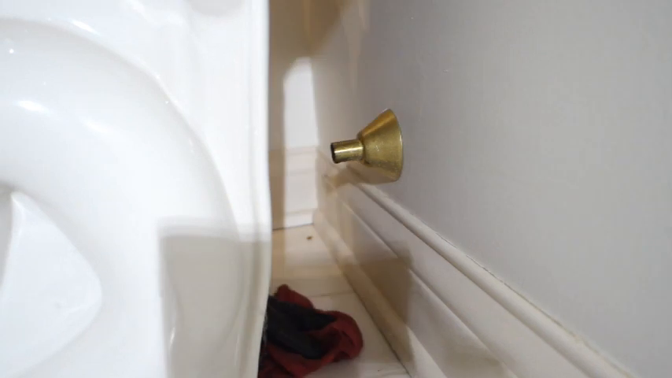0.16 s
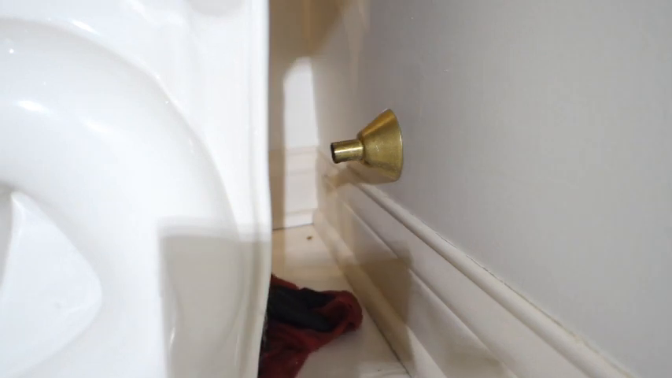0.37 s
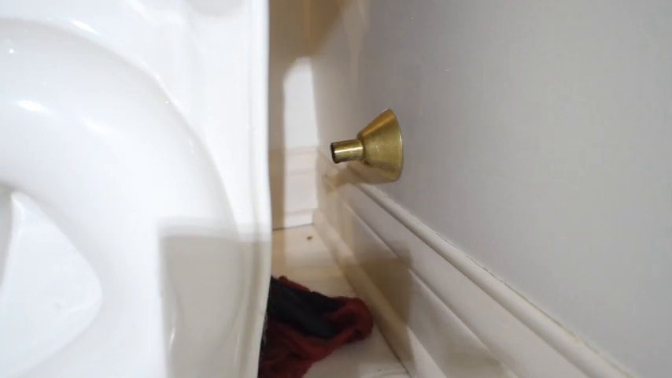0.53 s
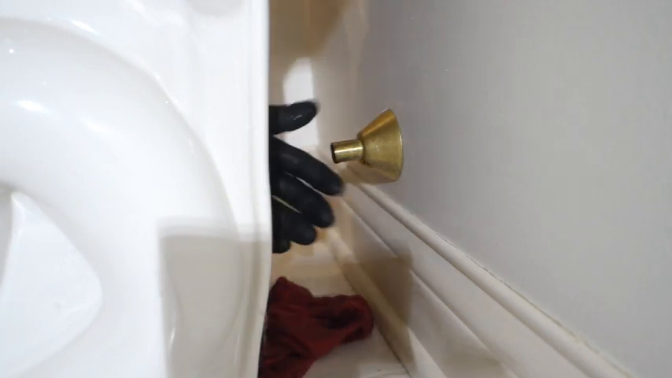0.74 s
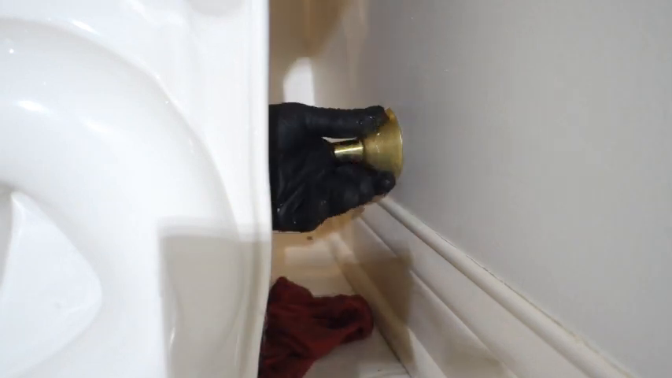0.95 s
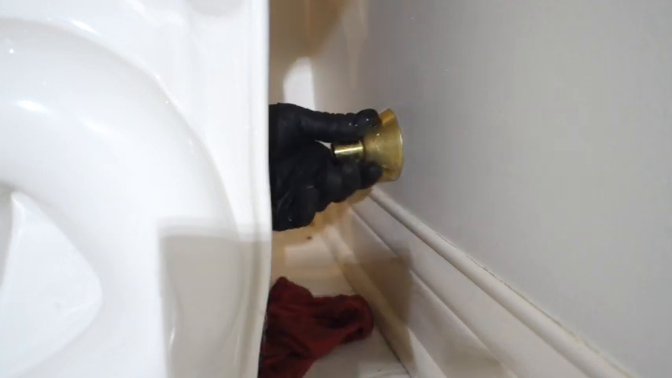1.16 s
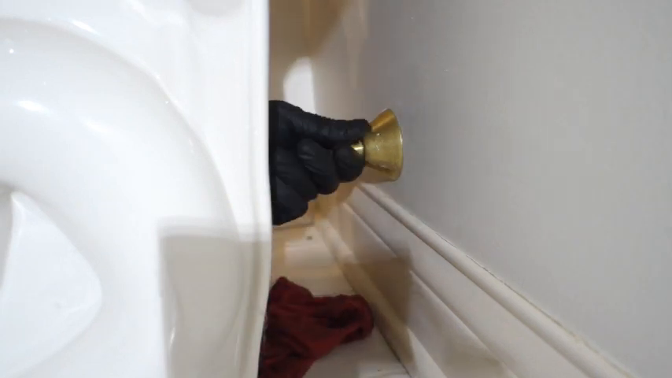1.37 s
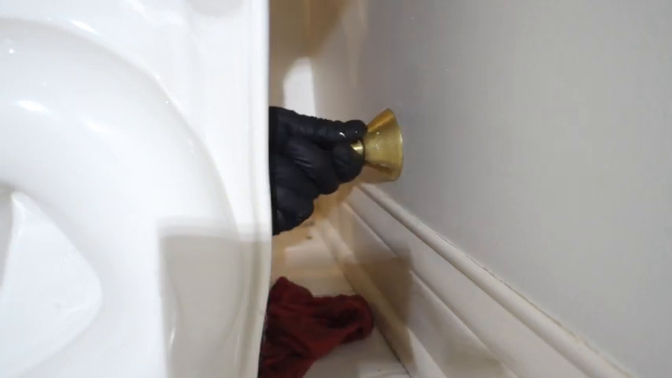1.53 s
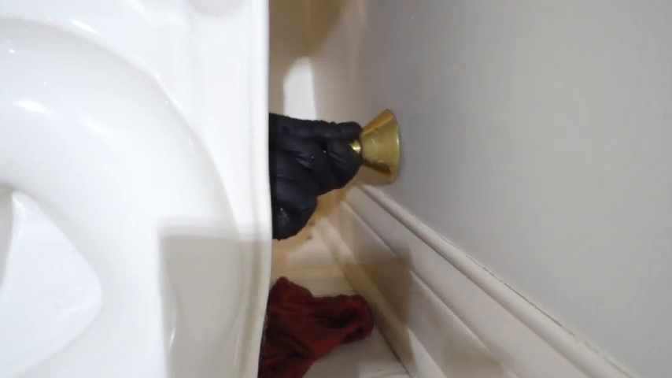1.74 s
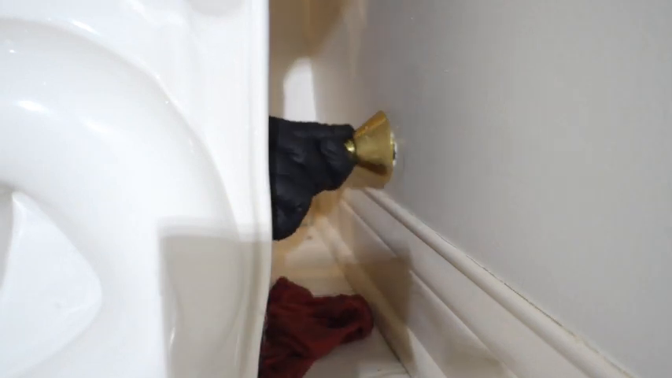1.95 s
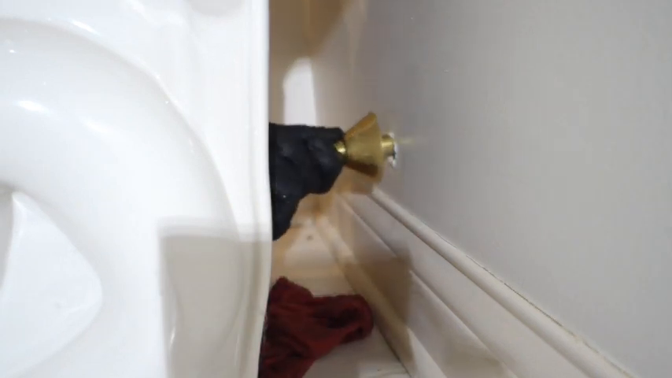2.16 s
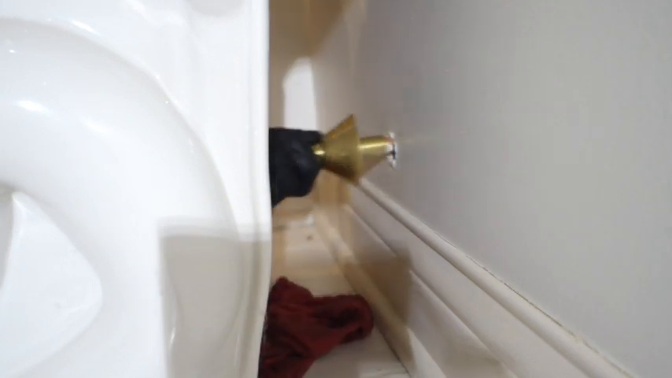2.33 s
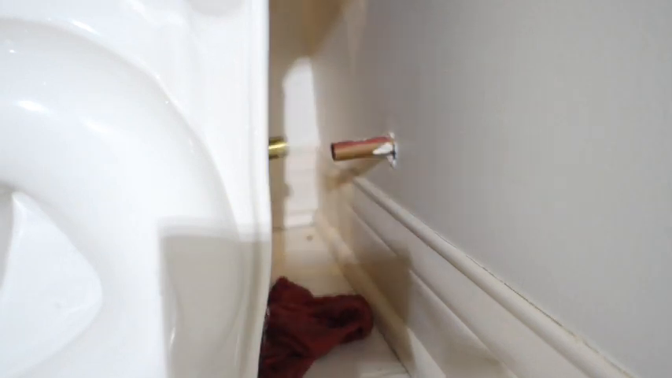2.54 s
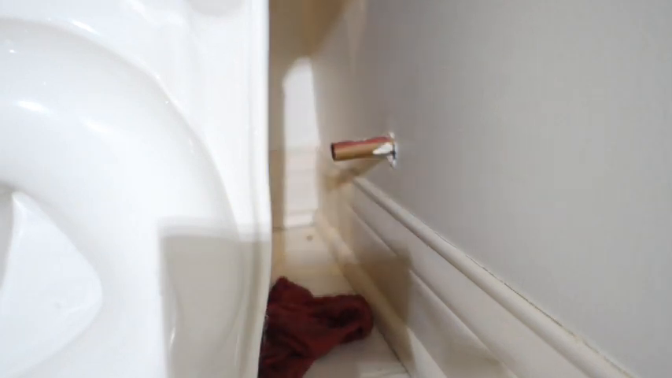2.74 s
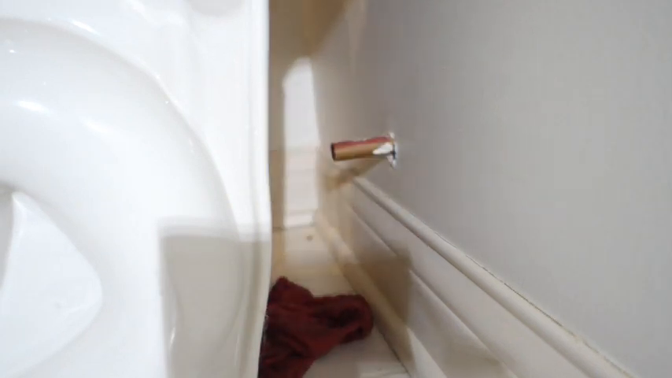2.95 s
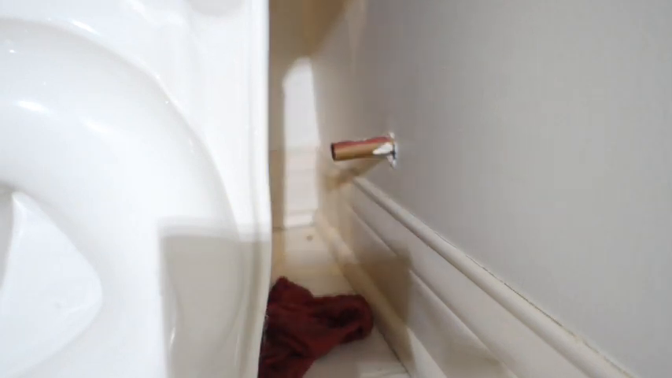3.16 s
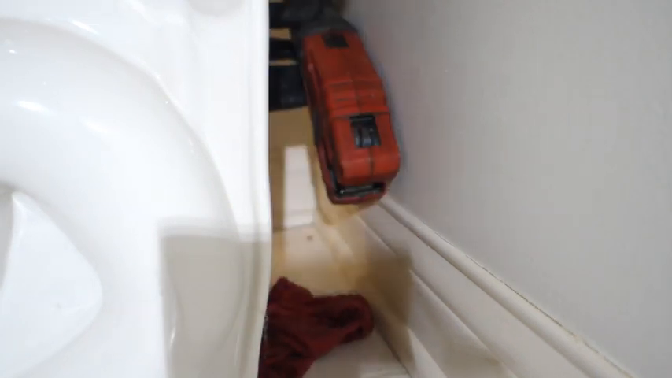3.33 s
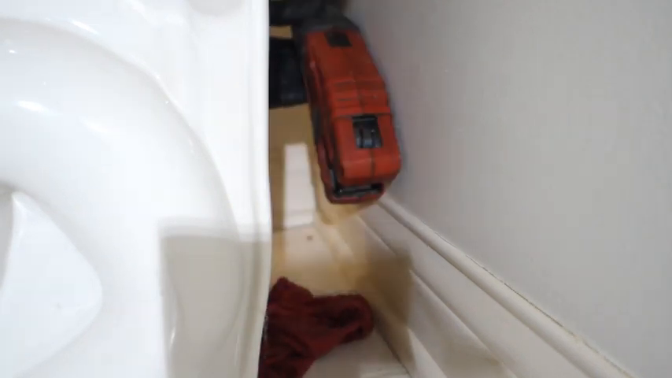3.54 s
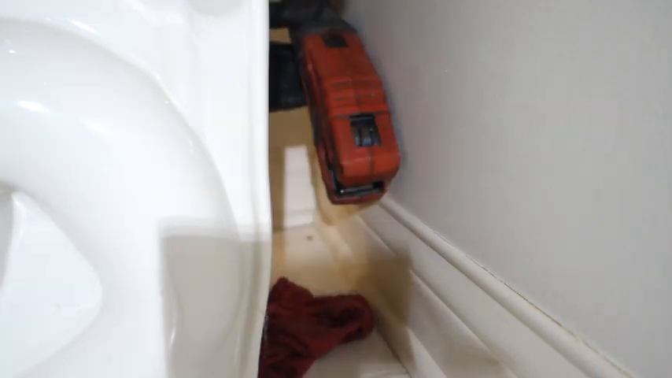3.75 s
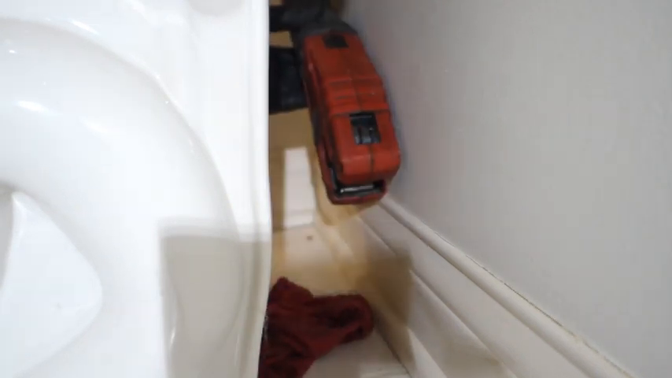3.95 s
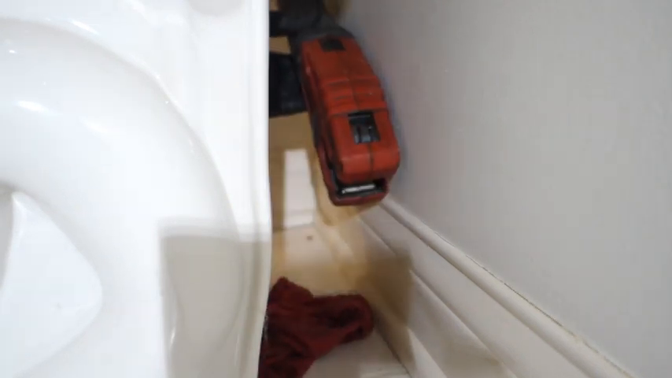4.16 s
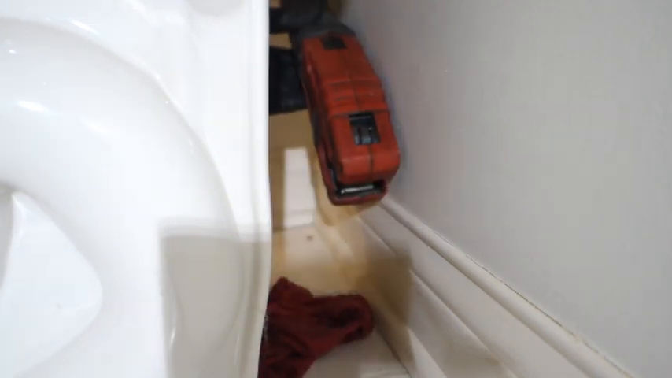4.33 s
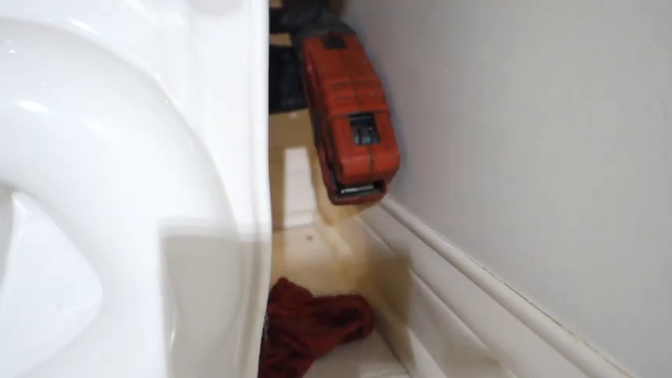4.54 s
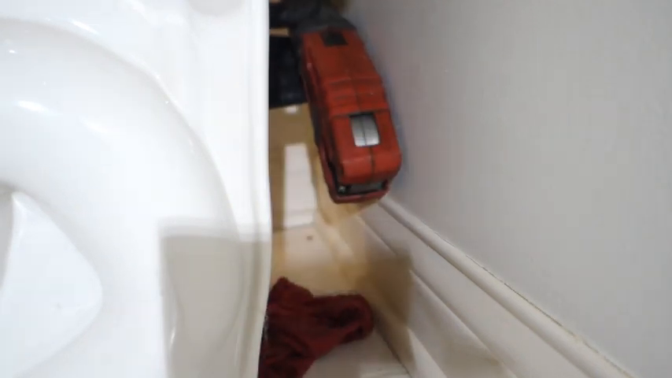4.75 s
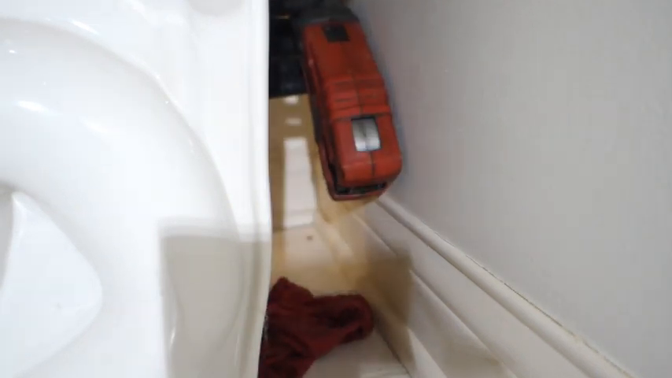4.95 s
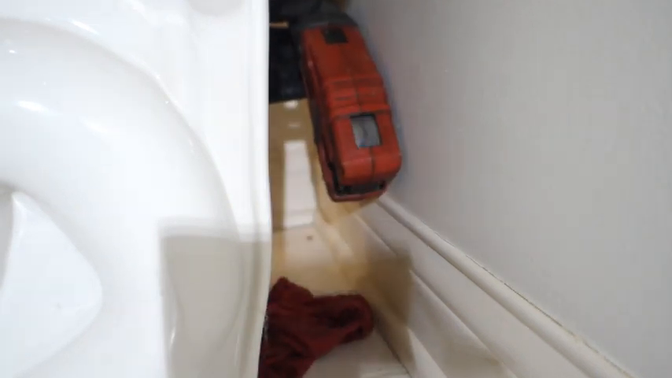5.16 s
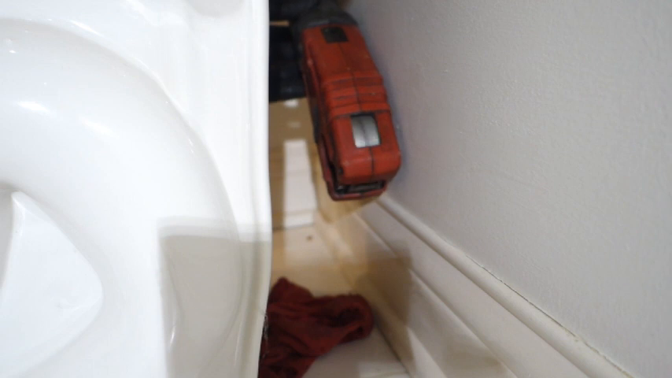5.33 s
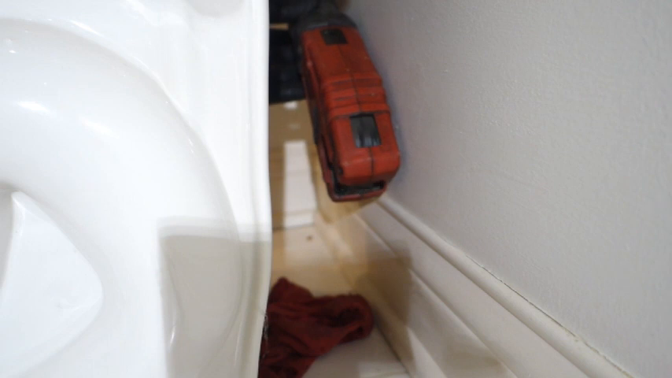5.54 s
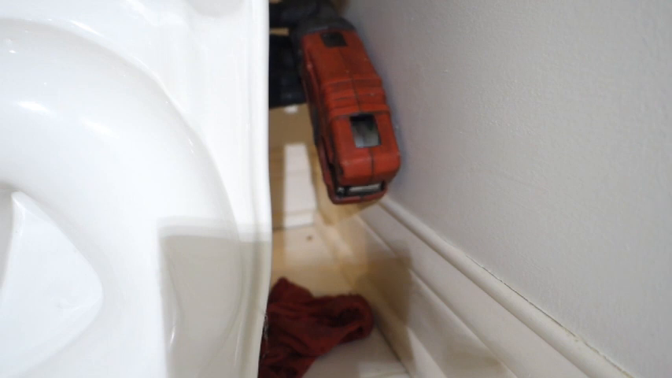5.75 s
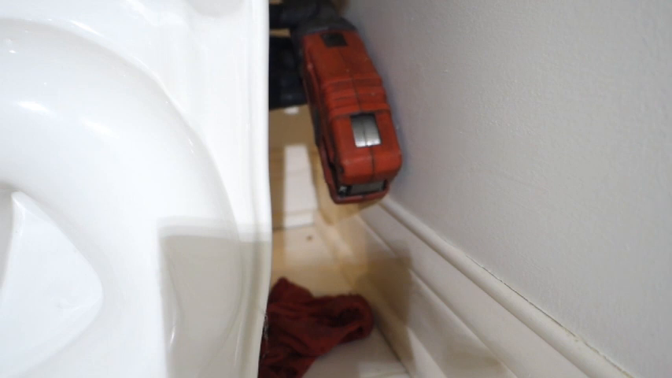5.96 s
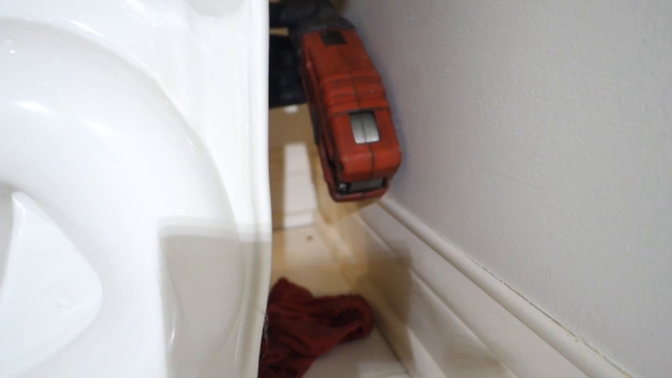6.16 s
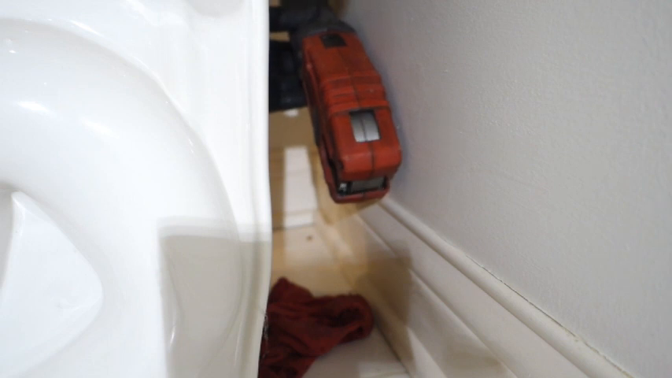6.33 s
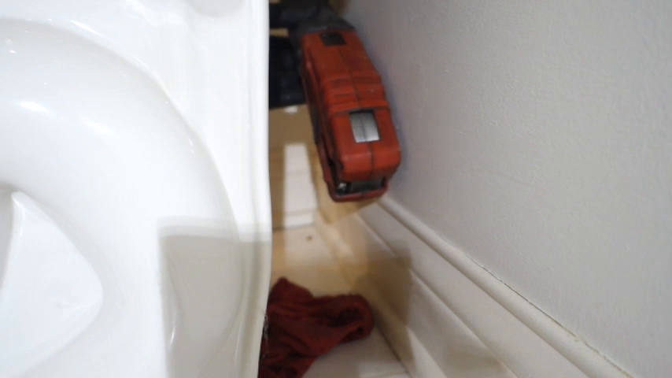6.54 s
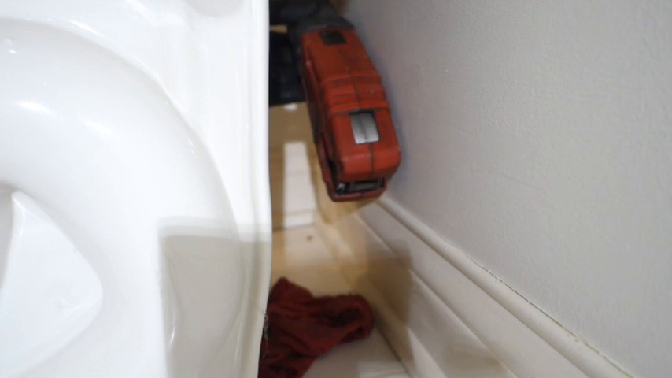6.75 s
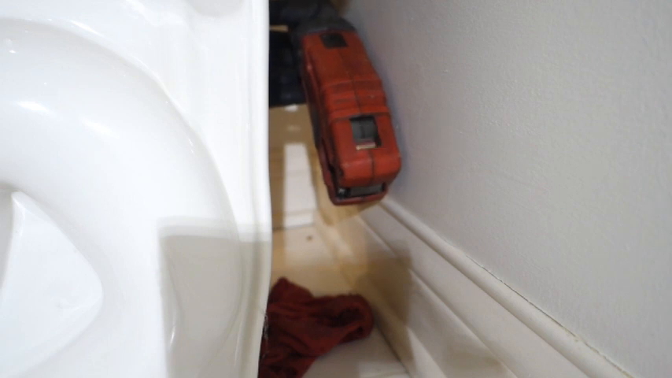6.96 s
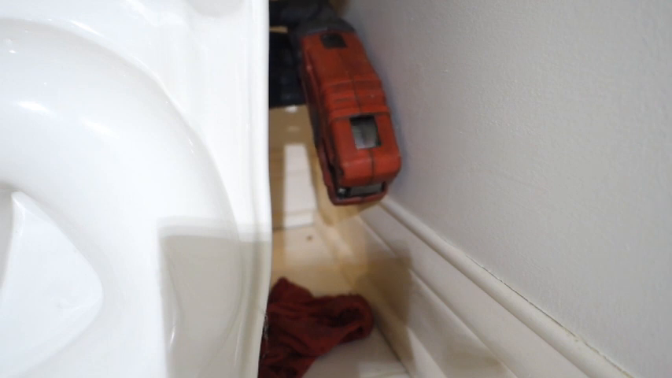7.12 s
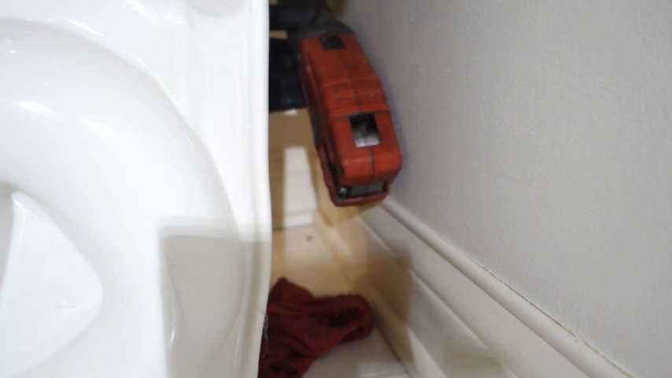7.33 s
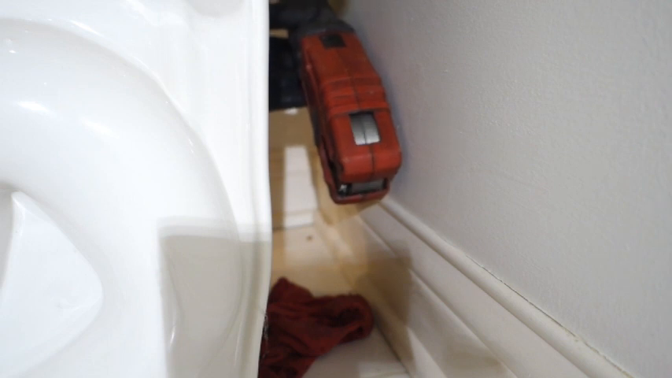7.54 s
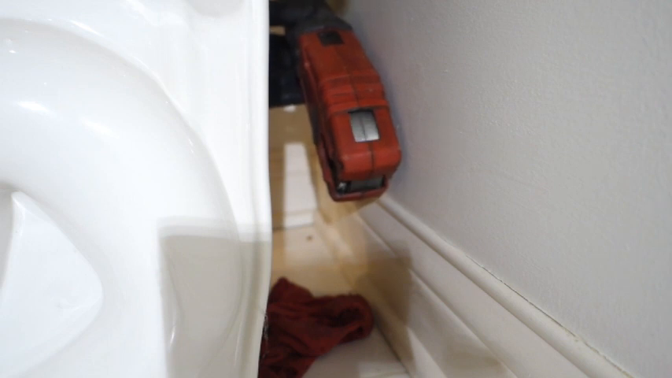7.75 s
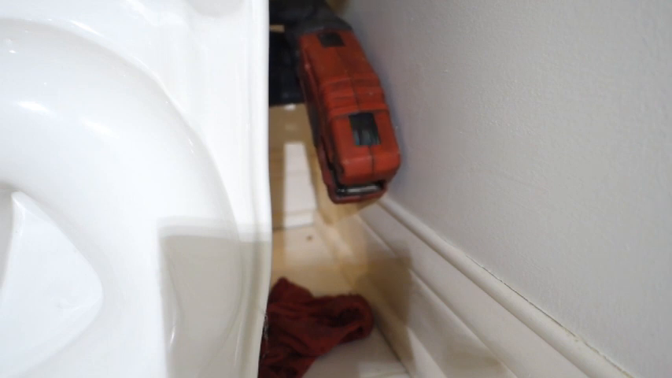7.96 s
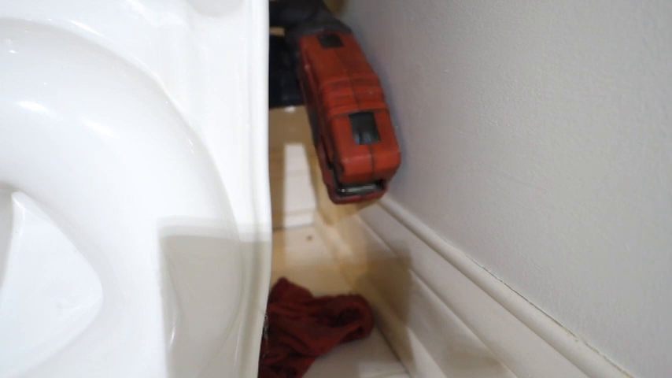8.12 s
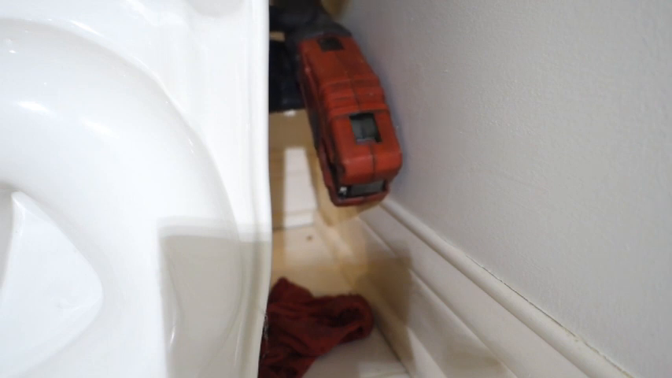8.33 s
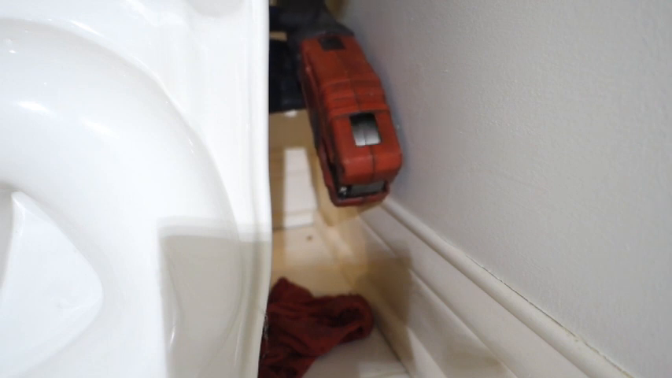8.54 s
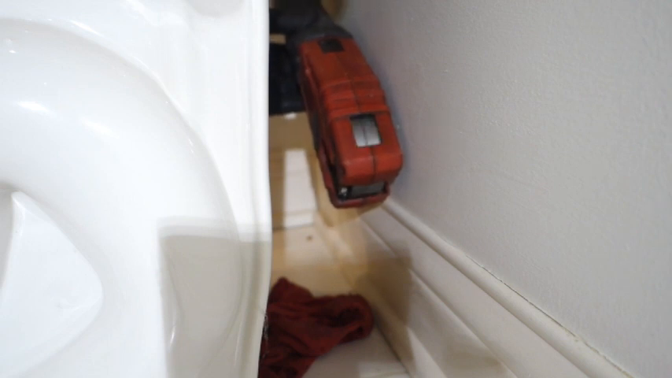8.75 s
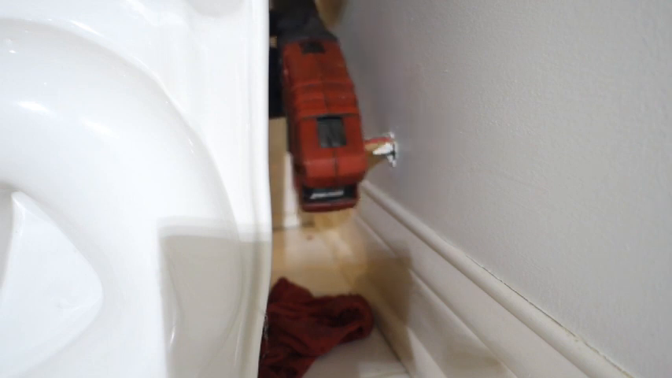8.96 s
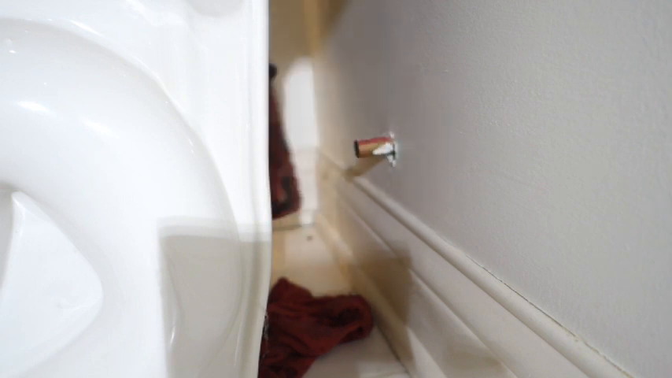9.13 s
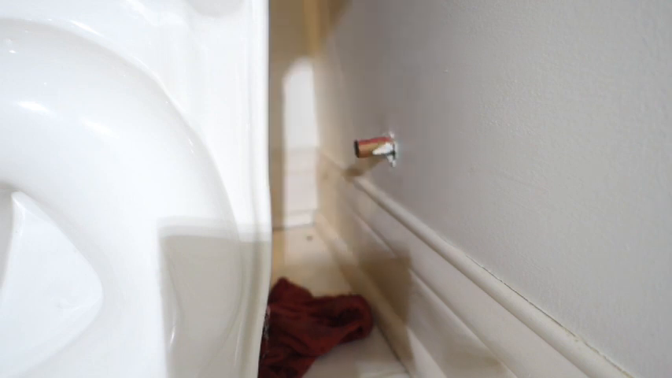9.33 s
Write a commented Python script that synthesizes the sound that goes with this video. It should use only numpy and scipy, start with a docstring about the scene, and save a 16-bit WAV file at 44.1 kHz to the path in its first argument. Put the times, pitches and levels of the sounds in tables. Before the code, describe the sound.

Close stereo sound of plumbing work beside a wall, a little to the right. Light ticks and hollow knocks lead to jerky, squeaky scraping with deep booms and a bright hiss as a brass collar comes free. A quiet pause with small bumps follows, then a battery pipe cutter runs for about four seconds, gear rattle and clicking pulsing each turn, before loud clacks and small metallic knocks over a soft fan hum.

```python
"""A fan hums faintly throughout in a small bathroom: coloured air noise and a wavering tone.
A gloved hand drags a brass flange off a copper stub: stick-slip noise booms in the hollow wall, then modes ring free.
A cordless tubing cutter is seated, snaps on and runs: uneven tooth impacts rattle it, and its cutting head
clicks through the same filtered contacts on every turn. At the end the pipe parts, the load falls away,
and decaying modes sound the loose piece knocking about in the head."""
import sys
import numpy as np
from scipy import signal
from scipy.fft import rfft, irfft, next_fast_len
from scipy.io import wavfile

SR = 44100
rng = np.random.default_rng(int(sys.argv[2]) if len(sys.argv) > 2 else 0)


def bounce(signal):
    """Save signal as a 16-bit WAV file at the path given by the first command-line argument."""
    frames = np.transpose(np.atleast_2d(signal))
    limited = np.clip(frames, -1, 1)
    pcm = np.round(limited * 32767).astype(np.int16)
    wavfile.write(sys.argv[1], SR, pcm)


N = 418509
TIME = np.arange(N) / SR

# Spectra list [frequency_hz, relative_level_db]; their resonances list [centre_hz, width_hz, lift_db].
# Modes list [frequency_hz, relative_level_db, t60_s]. Levels in tables are set against each other.

# air noise of the fan: spectrum and resonances; the tone beneath it
FAN = [(15, -41), (25, -21), (64, -7), (124, -12), (169, -9.5), (235, -11.5), (296, -20.5), (468, -19),
       (545, -16), (651, -21), (721, -21), (1080, -33.5), (1300, -29), (1670, -36), (11000, -43),
       (14300, -81), (22000, -120)]
FAN_PEAKS = [(556, 27, 10.8), (732, 56, 3.5)]
FAN_DB, HUM_HZ, HUM_DB = -54, 120.2, -49
HUM_WAVER_DB, HUM_WAVER_PER_S = 2.6, 16

# rubs on the pipe: gripping, tugging the flange off, seating the cutter, a low thudding rumble late in the cut
# [start_s, length_s, thud_db, wall_boom_db, brass_scrape_db]
RUBS = [(-.02, 0.08, -61, -49, -51), (.14, 0.78, -75, -66, -66), (.97, .3, -68, -47.5, -56.5),
        (1.28, 0.27, -52, -43, -56.5), (1.54, 0.029, -41, -32.5, -47), (1.6, 0.095, -47, -49, -53),
        (1.715, 0.09, -42, -30.5, -45), (1.775, 0.06, -34.5, -22.5, -38.5), (2.04, 0.057, -46, -24, -39.5),
        (2.08, 0.046, -34, -15.5, -31.5), (2.14, 0.15, -37, -22, -32), (2.25, 0.051, -28, -16, -22),
        (2.31, 0.045, -27, -17, -25), (2.36, 0.087, -46, -19, -28), (3.222, 0.031, -47, -42.5, -56.5),
        (3.41, 0.017, -39, -41, -59), (3.42, 0.048, -37, -59, -74), (3.55, .1, -56, -59, -80),
        (3.74, .1, -49, -50, -72), (4.08, 0.11, -58, -60, -85), (4.48, .04, -68, -58, -63),
        (4.52, 0.043, -59, -49, -53.5), (7.7, 1.42, -39, -62, -75)]
# glove rustling, and bright hissing bursts as the flange is pulled off [start_s, length_s, level_db]
RUSTLES = [(-.02, 0.3, -59), (.25, 0.094, -56), (.38, 0.25, -61.5), (.67, .06, -58.5), (1.0, 0.033, -56),
           (1.11, 0.12, -56.5), (1.75, 0.072, -52.5), (2.22, .09, -40.5), (2.39, 0.035, -38.5)]
RUB_ATTACK_S = .035
WALL_RELEASE_DB_PER_S, BRASS_RELEASE_DB_PER_S, RUSTLE_RELEASE_DB_PER_S = 100, 160, 170
RUSTLE_IN_RUB_DB = -16.5  # rustle against the scrape, within a rub
# spectrum of the wall's deep thud
THUD = [(15, -14), (45, 4), (85, 12.5), (120, 4), (200, -31), (500, -67)]
# spectrum and resonances of the hollow wall's boom
BOOM = [(80, -22), (130, -12), (175, -8.5), (240, 1.5), (300, -7), (440, -4.5), (540, -11.5), (680, -19.5),
        (1200, -64)]
BOOM_PEAKS = [(139, 9, 3.2), (206, 37, 10.2), (325, 39, 5.6), (461, 37, 6.3)]
# spectrum and resonances of the brass scrape
SCRAPE = [(300, -27), (650, 4.5), (900, 9), (1400, 4.5), (1900, 5.5), (2700, 1), (3200, -1), (4200, -8),
          (5000, -20), (8000, -32), (11000, -36)]
SCRAPE_PEAKS = [(1233, 70, 5.5), (2230, 45, 7.3), (2520, 82, 8.7), (3840, 220, 10.3), (4180, 140, 5.6)]
# spectrum of rustle and hiss
RUSTLE = [(1500, -13), (3500, -0.5), (5500, -5), (7200, -3), (9000, -7.5), (11000, -11.5)]

# light ticks of glove and tool on metal [start_s, level_db]; their spectrum
TICKS = [(0.0024, -26.5), (0.058, -33), (0.609, -39), (0.684, -33.5), (1.1258, -27.5), (1.4805, -30.5),
         (1.5564, -26.5), (1.9205, -28), (2.041, -33), (3.2156, -32.5), (3.428, -35.5), (3.6845, -54),
         (3.7808, -55), (4.0851, -54)]
TICK = [(200, 12), (700, 5), (2400, -5.5), (4500, -7.5), (6000, -12), (11000, -20)]
# soft bumps that travel through pipe and wall [start_s, level_db]; the wall's modes
BUMPS = [(0.003, -32), (0.026, -31.5), (0.085, -32), (1.288, -36), (1.335, -33), (1.544, -38), (3.223, -29),
         (3.299, -35.5), (3.731, -44), (3.839, -36.5), (4.104, -36), (4.166, -38), (4.581, -20.5),
         (9.099, -24), (9.207, -26.5), (9.385, -33)]
WALL_MODES = [(141.6, -2, 0.48), (165, -13, 0.2), (180, -3.5, 0.14), (225, -11, 0.31)]
# fingers knocking on the flange [start_s, level_db]; modes of flange and wall; spectrum of the crack
KNOCKS = [(0.937, -14), (1.3, -16), (1.796, -31), (1.862, -34), (2.073, -21), (2.116, -8.5)]
KNOCK_MODES = [(223, -18, 0.18), (261, -10.5, 0.073), (342, -3, 0.055), (450, -8, 0.045), (566, -11, 0.035),
               (1110, -23, 0.04), (1494, -20, .08), (1940, -24, 0.042), (2390, -16, 0.041),
               (3930, -13, .01)]
KNOCK = [(100, -26.5), (200, 3), (420, 4), (620, -4.5), (1000, -4.5), (1600, -8), (2400, -15),
         (3600, -23.5), (4600, -36), (5600, -36.5), (11000, -38)]

# modes of wall and flange as the flange leaves the pipe
FLANGE_MODES = [(140, -37, 1.1), (208, -29, 1), (425, -39, .5), (1061, -50, .54), (1267, -35, .62),
                (1357, -43, .47), (1560, -49, .7), (2187, -34.5, .62), (5750, -47.5, .48),
                (6697, -43.5, .39), (9711, -35.5, .27)]
FLANGE_S = 2.425
# the cutter's steel rollers touching the pipe as they settle [start_s, level_db, ring_hz]
CHINKS = [(3.684, -61, 4650), (3.781, -61, 2100), (4.085, -62, 2980)]

# trigger snaps, then the head's last clicks and contacts as it turns on [start_s, level_db]
SNAPS = [(4.5786, -18.5), (4.597, -14.5), (8.7577, -14), (8.887, -9), (8.921, -15), (9.0117, -16),
         (9.059, -8.5), (9.092, -11), (9.1194, -13.5), (9.1496, -18), (9.192, -7.5), (9.2544, -10),
         (9.2978, -10), (9.3084, -24), (9.3312, -15.5), (9.3816, -25), (9.4485, -12)]
# spectrum of the open steel head
STEEL = [(300, -53.5), (900, 5), (1800, 4.5), (3500, 3), (5000, 3.5), (6000, -0.5), (9000, -2), (11000, -3)]

TRIGGER_S, PARTED_S = 4.58, 8.84
# running speed of the head: sags as the wheel bites, gains as the cut deepens [time_s, turns_per_s]
SPEED = [(4.75, 5.5916), (4.95, 5.3485), (5.12, 5.5415), (5.8, 5.6928), (7.1, 5.7917), (8.45, 5.9196),
         (8.9, 6.0989)]
# gears whirring freely before the wheel bites [time_s, level_db]; their spectrum
FREE_RUN = [(4.59, -41), (4.635, -29), (4.71, -27), (4.76, -50)]
WHIRR = [(1000, -42), (2100, -8), (2450, 10), (2750, 3), (3100, -20), (5000, -49)]
# the load drops at the click, then surges several times within each turn [share_of_turn, load_db]
LOAD_IN_TURN = [(0, -19), (.06, -7), (.13, 7), (.26, -11), (.32, 3), (.41, 0.5), (.49, 1.5), (.58, 0),
                (.68, 3.5), (.79, 5.5), (.92, -1.5), (.98, 7)]
# short swells and dips of wall rumble and housing growl, growl surging as the pipe parts
# [middle_s, length_s, wall_rumble_change_db, housing_growl_change_db]
SWELLS = [(4.818, 0.13, 4, 5), (5.733, .06, 3, -1), (6.163, 0.088, -6, 3), (6.413, 0.065, -3.5, 3.5),
          (6.75, 0.06, 3.5, -1), (7.125, 0.11, 1, 5), (7.264, 0.062, 3.5, 4), (7.555, 0.42, 1.5, 3),
          (7.944, .08, 3.5, 2), (8.478, 0.049, 0.5, 5.5), (8.905, 0.17, 0.5, 10)]
# tones locked to the gears [cycles_per_turn, relative_level_db]
GEARS = [(14, -19), (33.3, -11), (37.6, -10), (146.5, -15), (119.8, -23)]
GEAR_WAVER_DB, TOOTH_T60_S = 4.5, .013
# spectrum and resonances of the wall's rumble
RUMBLE = [(15, -24), (32, -24), (50, -21), (100, -14.5), (160, -9.5), (240, -8.5), (290, -21), (400, -48),
          (800, -89)]
RUMBLE_PEAKS = [(52, 10, 4), (86, 4.3, 5.7), (124, 25, 3.3), (181, 13, 6.1), (197, 21, 3.9),
                (222.8, 14.8, 10.3), (243.7, 13, 5.9)]
# spectrum and resonances of the housing's growl
GROWL = [(150, -20), (240, -10), (290, -4), (400, 0.5), (500, -1.5), (600, -8), (800, -10.5), (1600, -59.5)]
GROWL_PEAKS = [(353, 21, 9.9), (371.5, 11, 1.7)]
# spectrum and resonances of the gears' rattle
RATTLE = [(200, -29.5), (500, -21.5), (650, -5), (780, 4.5), (960, -0.5), (1500, 3), (1950, -2.5),
          (3000, -3), (3300, -7), (5000, -8.5), (5600, -20.5), (7900, -16.5), (8500, -25.5), (11000, -29.5)]
RATTLE_PEAKS = [(702, 23, 4), (790, 48, 9.1), (828, 27, 4.6), (867, 37, 12), (1044, 17, 1.9),
                (1063, 15, 8.8), (1103, 17, 3.4), (1100, 22, 1.3), (1370, 42, 2.6), (1405, 31, 3.1),
                (1571, 20, 6.4), (1680, 100, 2.7), (1783, 26, 8), (1815, 34, 2.9), (2100, 63, 5),
                (2130, 31, 3.1), (2377, 38, 8.8), (2580, 22, 8.5), (2898, 48, 3.2), (3046, 100, 6),
                (4920, 25, 1.8)]
# drive levels before the mix; growl follows a share of the load in dB, rattle goes on without load
RUMBLE_DB, GROWL_DB, GROWL_FOLLOWS = -20, -27, 0.56
RATTLE_DB, IDLE_RATTLE_DB = -21, -28.5
# time constants of engaging gears and biting wheel; the load eases as the copper thins, falls once it parts
ENGAGE_S, BITE_S, EASING_DB_PER_S, RELEASE_DB_PER_S = .014, .1, .9, 46
LOAD_WANDER_DB, LOAD_WANDER_PER_S = .6, 9

# steel contacts within one turn
# [share_of_turn, relative_level_db, ring_hz, ring_width_hz, ring_lift_db, t60_s]
CONTACTS = [(0.0, -1.5, 4680, 600, 9, 0.023), (0.094, -9.5, 2550, 350, 20.5, 0.057),
            (0.266, -9, 8900, 2500, 9, 0.013), (0.301, -7, 1490, 700, 21, 0.032),
            (0.449, -2, 3730, 604, 10, 0.017), (.49, -10.5, 6260, 600, 11.5, 0.038),
            (0.583, -14, 3520, 347, 19.5, 0.13), (.712, -11.5, 7430, 1200, 12.5, 0.038)]
FIRST_CLICK_S, CUTTING_TURNS = 4.6774, 25
CLICK_DB, CLICK_GROWTH_DB_PER_S = -13.5, 0.43

# the cut-off piece knocking in the head [start_s, level_db]; its modes
LOOSE = [(9.192, -18), (9.262, -22), (9.298, -15.5), (9.332, -12.5), (9.367, -16.5), (9.443, -15),
         (9.452, -9.5)]
LOOSE_MODES = [(418, -8.5, 0.048), (754, 2.5, 0.026), (840, -1, 0.062), (911, -3.5, 0.1), (1099, -13, 0.14),
               (1390, -9.5, 0.14), (1510, -23, .1)]

# likeness of left and right [frequency_hz, coherence]
LIKENESS = [(100, .95), (250, .9), (700, .82), (1400, .8), (2800, .7), (5500, .5), (10000, .27)]
# left level minus right level for a source fully aside [frequency_hz, difference_db]
BALANCE = [(60, 2), (110, -4), (190, -0.5), (350, -1.5), (620, -2.5), (1120, -1.5), (2010, -3), (3620, -8),
           (6500, -6.5), (11700, -6.5)]
ROOM_T60_S = 0.49
# gain control: threshold, share of the excess taken off, averaging time; then the top of the band
AGC_THRESHOLD_DB, AGC_SHARE, AGC_S = -18.5, .5, .03
CUTOFF_HZ = 11080

PATH_0_ONLY = np.array([[1], [0]])  # puts a sound on the path common to left and right


def from_db(db):
    """Amplitude gain is ten to the power of decibels over twenty."""
    return 10 ** (np.asarray(db) / 20)


def rms_one(x):
    """Normalisation: dividing by the root mean square gives unit power."""
    return x / np.sqrt(np.mean(x ** 2) + 1e-20)


def gains(rows):
    """Envelope: levels interpolated in decibels give gains, held at -120 dB outside their span."""
    s, *columns = np.transpose(rows)
    return [from_db(np.interp(TIME, s, c, left=-120, right=-120)) for c in columns]


def at_hz(points, hz):
    """Spectra are interpolated on a logarithmic frequency axis."""
    f, value = np.transpose(points)
    return np.interp(np.log(hz + 1), np.log(f + 1), value)


def drift(rate):
    """Random modulation: chance knots, rate per second, joined by lines and scaled to unit rms."""
    knots = rng.standard_normal(int(N / SR * rate) + 2)
    return rms_one(np.interp(TIME * rate, np.arange(len(knots)), knots))


def colour(x, spectrum, peaks=(), size=16384):
    """Minimum-phase filtering: the causal half of the cepstrum yields a response of unit power."""
    hz = np.arange(size // 2 + 1) * SR / size
    db = at_hz(spectrum, hz)
    for centre, width, lift in peaks:
        db = db + lift / (1 + (2 * (hz - centre) / width) ** 2)
    cepstrum = irfft(np.log(from_db(db)))
    cepstrum[size // 2:] = 0
    response = irfft(np.exp(2 * rfft(cepstrum)))[:size // 2]
    unit_response = response / np.linalg.norm(response)
    return signal.oaconvolve(x, unit_response[None], axes=1)[:, :N]


def clicks(times, heights):
    """Impulsive excitation: each blow is a single sample."""
    samples = np.round(np.asarray(times) * SR).astype(int)
    return np.bincount(np.clip(samples, 0, N - 1), heights, N)


def decay(energy, t60):
    """Exponential decay: each energy impulse falls by 60 dB in t60 seconds."""
    return signal.lfilter([1], [1, -from_db(-60 / (t60 * SR)) ** 2], energy)


def bursts(times, db, t60, room_db):
    """Impact noise: crack and room tail add in energy and shape two independent noise paths."""
    energy = clicks(times, from_db(db) ** 2) + 1e-18
    crack = decay(energy, t60)
    tail = decay(energy, ROOM_T60_S)
    return np.sqrt(crack + from_db(room_db) ** 2 * tail) * rng.standard_normal((2, N))


def ring(times, db, modes, uneven_db=0):
    """Modal synthesis: blows of given strength, uneven if asked, drive damped resonators of alternating sign."""
    out = np.zeros(N)
    chances = np.clip(rng.standard_normal((len(modes), len(times))), -2, 2)
    for k, ((hz, level_db, t60), chance) in enumerate(zip(modes, chances)):
        radius = from_db(-60 / (t60 * SR))
        angle = 2 * np.pi * hz / SR
        blows = clicks(times, from_db(db + level_db + uneven_db * chance)) + 1e-18
        poles = [1, -2 * radius * np.cos(angle), radius * radius]
        out += (-1) ** k * signal.lfilter([0, np.sin(angle)], poles, blows)
    return out * PATH_0_ONLY


def jangle(times, db, low_hz, high_hz, t60, uneven_db, count):
    """Dense modal ringing: blows excite many short metal modes unevenly on two paths of unit rms."""
    pitches = np.geomspace(low_hz, high_hz, count) * (1 + 0.029 * rng.uniform(-0.61, 1, count))
    paths = []
    for part in (pitches, pitches[::2] * 1.02):
        modes = [(hz, 10 * np.log10(hz / low_hz), t60) for hz in part]
        paths.append(rms_one(ring(times, db, modes, uneven_db)[0]))
    return np.array(paths)


def friction(per_s, spread_db, t60, room_db):
    """Stick-slip friction: random slips of uneven size merge into noise of unit rms."""
    times = TIME[rng.random(N) < per_s / SR]
    db = spread_db * np.clip(rng.standard_normal(len(times)), -2, 2)
    return rms_one(bursts(times, db, t60, room_db))


def strokes(rows, attack_s, release_db_per_s):
    """Energy summation: strokes swell, hold and die away, giving one gain for each level column."""
    power = 0
    for start, length, *db in rows:
        age = TIME - start
        release = from_db(-np.clip(release_db_per_s * (age - length), 0, 200))
        shape = np.clip(age / attack_s, 0, 1) * release
        power = power + np.outer(from_db(db), shape) ** 2
    return np.sqrt(power)


def room(x, wet_db):
    """Reverberation: path 0 convolved with decaying noise adds the dense echoes of the small hard room."""
    t = TIME[:SR // 2]
    tail = rng.standard_normal((2, len(t))) * from_db(-60 * t / ROOM_T60_S) * (t > .004)
    tail = tail / np.linalg.norm(tail[0])
    return x + from_db(wet_db) * signal.oaconvolve(x[:1], tail, axes=1)[:, :N]


def fan():
    """Broadband flow noise is joined by a mains hum of wavering level and phase."""
    air = from_db(FAN_DB) * colour(rng.standard_normal((2, N)), FAN, FAN_PEAKS)
    hum_gain = from_db(HUM_DB + HUM_WAVER_DB * drift(HUM_WAVER_PER_S))
    hum = hum_gain * np.sin(2 * np.pi * HUM_HZ * TIME + 0.5 * drift(12))
    return air + hum * PATH_0_ONLY


def handling():
    """Stick-slip noise excites hollow wall and brass, with glove rustle and bright hissing bursts."""
    thud, boom, _ = strokes(RUBS, RUB_ATTACK_S, WALL_RELEASE_DB_PER_S)
    scrape = strokes(RUBS, RUB_ATTACK_S, BRASS_RELEASE_DB_PER_S)[2]
    hiss = strokes(RUSTLES, RUB_ATTACK_S, RUSTLE_RELEASE_DB_PER_S)[0]
    rustle = np.hypot(hiss, from_db(RUSTLE_IN_RUB_DB) * scrape)
    slips = friction(per_s=240, spread_db=2, t60=0.0042, room_db=-14)
    catches = TIME[rng.random(N) < 70 / SR]
    pings = jangle(catches, 0, low_hz=1200, high_hz=7000, t60=.07, uneven_db=6, count=16)
    wall = colour(thud * slips, THUD)
    wall = wall + from_db(-2.5) * colour(boom * slips, BOOM, BOOM_PEAKS)
    brass = from_db(-2.5) * colour(scrape * (slips + from_db(-5.5) * pings), SCRAPE, SCRAPE_PEAKS)
    fine_slips = friction(per_s=880, spread_db=6, t60=.008, room_db=-14)
    return wall + brass + colour(rustle * fine_slips, RUSTLE)


def ticks():
    """Light impact: touches of glove and tool give short coloured noise bursts."""
    s, db = np.transpose(TICKS)
    return colour(bursts(s, db - 11, t60=0.031, room_db=-7.5), TICK)


def bumps():
    """Structure-borne sound: soft bumps set the wall's low modes ringing."""
    s, db = np.transpose(BUMPS)
    return from_db(-1) * ring(s, db, WALL_MODES)


def knocks():
    """Modal impact: fingers excite the hollow flange and wall, with a noisy crack of contact."""
    s, db = np.transpose(KNOCKS)
    body = from_db(-7.5) * ring(s + 0.00096, db, KNOCK_MODES)
    crack = colour(bursts(s + 0.0016, db - 13.5, t60=0.048, room_db=-4.5), KNOCK)
    return body + crack


def flange_ring(release_s=0.025):
    """Release of damping: once off the pipe the flange rings, swelling from the scrape, wavering in the hand."""
    free = np.clip((TIME - FLANGE_S) / release_s, 0, 1)
    waver = from_db(2.5 * drift(40))
    return room(free * waver * ring([FLANGE_S], -1.5, FLANGE_MODES), wet_db=-12)


def chinks(t60=0.069):
    """Single-mode impact: each light touch of a roller rings briefly into the room."""
    touches = sum(ring([s], db, [(hz, 0, t60)]) for s, db, hz in CHINKS)
    return room(touches, wet_db=-5)


def snaps():
    """Impact on resonant steel: the trigger, then the head's last clicks and contacts, as noise bursts."""
    s, db = np.transpose(SNAPS)
    return colour(bursts(s, db - 10.5, t60=0.11, room_db=-11.5), STEEL, [(3560, 970, 5.6)])


def rise(time_constant_s):
    """First-order response: climbs exponentially from 0 towards 1 once the trigger is pulled."""
    return 1 - np.exp(-np.maximum(TIME - TRIGGER_S, 0) / time_constant_s)


def head_angle():
    """Integration of speed: turns since the first click, with spin-up at the trigger."""
    speed = rise(.02) * np.interp(TIME, *np.transpose(SPEED))
    turns = np.cumsum(speed) / SR
    return turns - np.interp(FIRST_CLICK_S, TIME, turns)


def cutting_load():
    """Load-dependent excitation: the wheel's load sets gains of wall rumble, housing growl, gear rattle."""
    release_db = -RELEASE_DB_PER_S * np.maximum(TIME - PARTED_S, 0)
    easing_db = -EASING_DB_PER_S * (TIME - TRIGGER_S)
    load_db = release_db + easing_db + LOAD_WANDER_DB * drift(LOAD_WANDER_PER_S)
    wall_db, housing_db = sum(np.outer(changes, np.exp(-(2 * (TIME - s) / length) ** 2))
                              for s, length, *changes in SWELLS)
    rumble = rise(BITE_S) * from_db(RUMBLE_DB + load_db + wall_db)
    growl = from_db(GROWL_DB + GROWL_FOLLOWS * load_db + housing_db)
    rattle = from_db(IDLE_RATTLE_DB + (RATTLE_DB - IDLE_RATTLE_DB) * from_db(release_db))
    return rise(ENGAGE_S) * np.array([rumble, growl, rattle])


def gear_train(angle, teeth_per_turn=33):
    """Gear-mesh excitation: uneven tooth impacts rattle the housing; the surging load shakes pipe and wall."""
    rumble, growl, rattle = cutting_load()
    free_run, = gains(FREE_RUN)
    load_db = np.interp(angle, *np.transpose(LOAD_IN_TURN), period=1)
    teeth = TIME[1:][np.diff(np.floor(angle * teeth_per_turn)) > 0]
    teeth = teeth + .0008 * rng.standard_normal(len(teeth))  # backlash
    force_db = 3.22 * np.clip(rng.standard_normal(len(teeth)), -2, 2)
    impacts = rms_one(bursts(teeth, force_db, t60=TOOTH_T60_S, room_db=-17.5))
    # the heavy body evens the blows out
    shake = rms_one(bursts(teeth, force_db / 2, t60=0.041, room_db=-13.5))
    pings = jangle(teeth, force_db, low_hz=950, high_hz=10000, t60=.065, uneven_db=9, count=56)
    tones = 0
    for order, db in GEARS:
        tone_gain = from_db(db + GEAR_WAVER_DB * drift(14))
        tones = tones + tone_gain * np.sin(2 * np.pi * order * angle + 0.58 * drift(8.2))
    wall = from_db(-4) * colour(rumble * from_db(0.7 * load_db) * shake, RUMBLE, RUMBLE_PEAKS)
    housing = from_db(-1.5) * colour(growl * from_db(0.61 * load_db) * shake, GROWL, GROWL_PEAKS)
    metal = from_db(-4.5) * colour(rattle * (impacts + pings), RATTLE, RATTLE_PEAKS)
    whirr = colour(free_run * impacts, WHIRR)
    return wall + housing + metal + whirr + from_db(1) * rumble * tones * PATH_0_ONLY


def head_clicks(angle):
    """Periodic impact: the open head passes the same steel contacts each turn, each with its own resonance."""
    out = 0
    for share, level_db, hz, width, lift_db, t60 in CONTACTS:
        s = np.interp(np.arange(CUTTING_TURNS) + share, angle, TIME)
        growth_db = CLICK_GROWTH_DB_PER_S * (s - TRIGGER_S)
        strength_db = CLICK_DB + growth_db + level_db + 1.9 * rng.standard_normal(len(s))
        contact = bursts(s, strength_db, t60, room_db=-13)
        out = out + colour(contact, STEEL, [(hz, width, lift_db)])
    return out


def loose_piece():
    """Free modal vibration: the cut-off pipe rings as it knocks in the head, with reverberation."""
    s, db = np.transpose(LOOSE)
    return from_db(-3.5) * room(ring(s, db, LOOSE_MODES), wet_db=-4)


def ports(paths, aside):
    """Coherence of two channels: two paths mix to left and right, alike in the bass, apart in the treble."""
    size = next_fast_len(N + SR // 10)
    hz = np.arange(size // 2 + 1) * SR / size
    alike = np.clip(at_hz(LIKENESS, hz), 0, .999)
    mid, side = rfft(paths, size)
    sign = np.array([[1], [-1]])  # left, right
    spread = sign * side * np.sqrt((1 - alike) / (1 + alike))
    shading = from_db(sign * aside * at_hz(BALANCE, hz) / 2)
    return irfft((mid + spread) * shading, size)[:, :N]


def scene():
    """Superposition: the work lies a little to the right, the fan in the middle."""
    hands = handling() + ticks() + bumps() + knocks() + flange_ring() + chinks()
    angle = head_angle()
    drive = from_db(0.28) * (gear_train(angle) + head_clicks(angle))
    cutter = snaps() + drive + loose_piece()
    return ports(fan(), aside=0) + ports(hands, aside=0.98) + ports(cutter, aside=0.77)


def record(dry):
    """Dynamic compression lowers loud passages; saturation rounds peaks and a low-pass cuts the top."""
    keep = np.exp(-1 / (AGC_S * SR))
    power = signal.lfilter([1 - keep], [1, -keep], np.mean(dry ** 2, axis=0))
    level_db = 10 * np.log10(power + 1e-12)
    held = dry * from_db(-AGC_SHARE * np.maximum(level_db - AGC_THRESHOLD_DB, 0))
    low_pass = signal.ellip(12, .1, 80, CUTOFF_HZ, fs=SR, output="sos")
    return signal.sosfilt(low_pass, np.tanh(held))


dry = scene()
out = record(dry)
bounce(out)
```